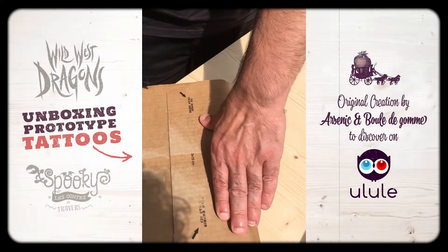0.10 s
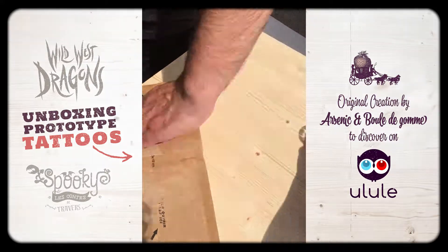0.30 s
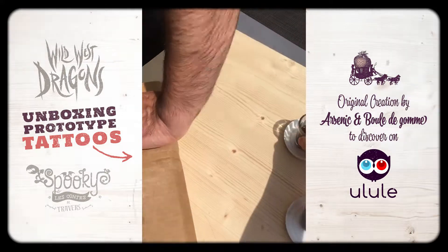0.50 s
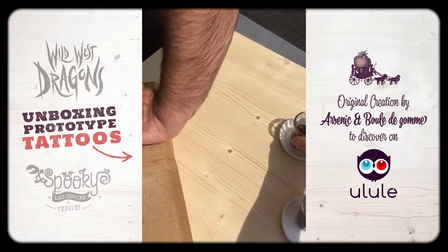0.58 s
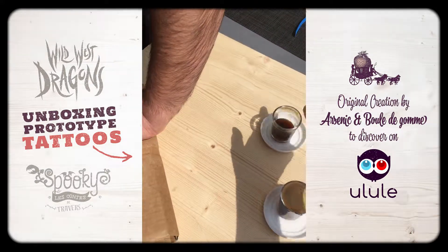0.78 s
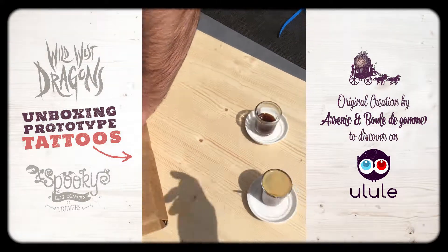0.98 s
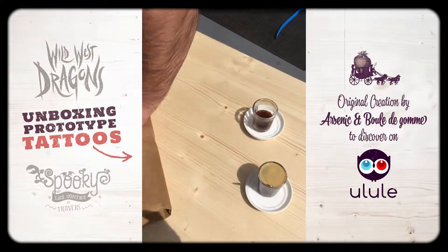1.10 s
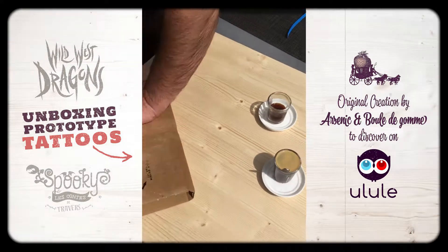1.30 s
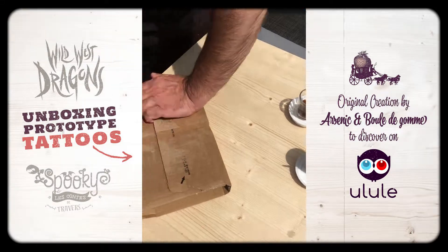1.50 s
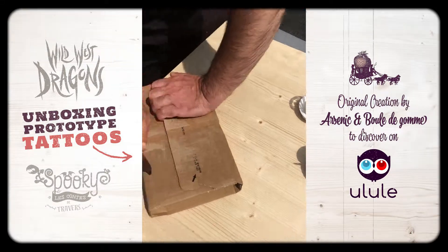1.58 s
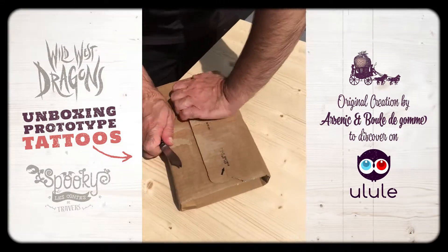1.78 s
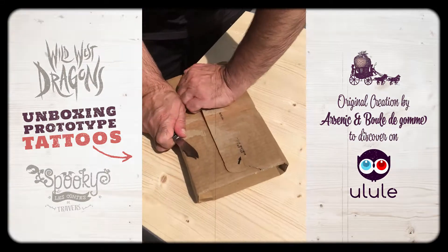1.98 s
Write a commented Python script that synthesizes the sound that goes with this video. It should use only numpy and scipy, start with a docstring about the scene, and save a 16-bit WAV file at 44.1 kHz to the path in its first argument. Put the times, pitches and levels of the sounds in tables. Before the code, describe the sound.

Close mono pickup of a cardboard mailer: hand hiss and a sharp crease snap, a knife knocking on wood, a boxy thump, then sliding, a bright blade tick, gritty rasps and small crackles over quiet rumble.

```python
"""Turning a cardboard mailing envelope

A palm hisses over the card and the parcel scrapes on a wooden table: filtered noise with tiny clicks.
Creases crackle in short bursts of impacts, and the hollow parcel thumps down once as a set of fading tones.
A steel knife clinks against the table, ringing blade and wood, and later gives one sharp, bright tick.
Dull nudges of the hands, gritty rasps and a low background rumble fill in the rest."""
import sys
import numpy as np
from scipy import signal
from scipy.fft import rfft, irfft
from scipy.io import wavfile

SR = 44100
rng = np.random.default_rng(int(sys.argv[2]) if len(sys.argv) > 2 else 0)


def unload_audio(sound):
    """Save the sound as a 16-bit wav file, at the path given as the first command line argument."""
    columns = np.transpose(np.atleast_2d(sound))
    # keep every value between -1 and 1, then stretch to whole-number steps
    steps = np.round(np.clip(columns, -1, 1) * 32767)
    wavfile.write(sys.argv[1], SR, steps.astype(np.int16))


N = 88200  # length of the scene in samples: two seconds
T = np.arange(N) / SR  # time of each sample in seconds

# All colour tables set only the balance of pitches; the filter evens out their overall level.
# Palm rubbing the card, following its pressure: time_s, level_db
PALM_STROKE = [(0, -43.5), (.035, -46.5), (.09, -44.5), (.125, -62.5), (.165, -67), (.205, -37),
               (.235, -69), (.27, -48.5), (.297, -95), (.39, -65.5), (.47, -60), (.53, -54), (.57, -63),
               (.61, -46), (.655, -45), (.71, -41.5), (.745, -63), (.78, -51.5), (.85, -56), (1.0, -46),
               (1.11, -61), (1.25, -53.5), (1.33, -49.5), (1.43, -46.5), (1.48, -55), (1.54, -58),
               (1.62, -45.5), (1.7, -46), (1.77, -47.5), (1.8, -48.5), (1.87, -49.5), (1.96, -43.5),
               (2.0, -44)]
# Tone colour of the palm's hiss: pitch_hz, level_db
PALM_COLOUR = [(60, -8), (300, -6), (520, -6), (900, 0), (1600, 0), (3200, -3), (5000, -10.5), (6300, -1),
               (8000, -3.5), (10500, -0.5), (12500, 2), (15500, 0)]
# Parcel sliding on the table, following its speed: time_s, level_db
SLIDE_STROKE = [(0, -62), (.085, -49.5), (.13, -67), (.15, -53), (.2, -49.5), (.245, -93), (.3, -103),
                (.39, -71), (.46, -60.5), (.57, -71.5), (.75, -57.5), (.81, -51), (.845, -59), (.87, -52.5),
                (.92, -51), (1.01, -43), (1.1, -50.5), (1.14, -49.5), (1.21, -53), (1.27, -48.5),
                (1.34, -60), (1.42, -53.5), (1.49, -63.5), (1.53, -54), (1.58, -47), (1.68, -56.5),
                (1.76, -59), (1.81, -51.5), (2.0, -59.5)]
# Tone colour of the slide: pitch_hz, level_db
SLIDE_COLOUR = [(60, -7), (170, -4), (310, 10.5), (520, -7), (760, -4.5), (1050, 2), (2000, -0.5),
                (3000, -6), (4600, -8), (6000, -7.5), (8000, -11), (15500, -21)]
# Short rasps of the parcel's edge on the wood: start_s, length_s, level_db
RASPS = [(1.109, 0.067, -51), (1.275, 0.16, -45), (1.819, 0.26, -53.5)]
# Tone colour of the rasps: pitch_hz, level_db
RASP_COLOUR = [(300, -22), (900, -7), (2100, 2), (3500, 3), (4500, -0.5), (5600, 1), (7500, -6),
               (15500, -13)]
# Creases giving way: start_s, level_db, length_s, treble_db, push_db (on the parcel, against the crack)
CREASES = [(.029, -42, .004, 6, -25), (.084, -39, .005, -2, -20), (.1418, -38, .0015, 0, -9),
           (.181, -38, .004, -2, -19), (.188, -39, .002, 2, -22), (.2125, -23, .002, 2, -17),
           (.2155, -21, .0017, 2, -14), (.2655, -42, .003, 7, -28), (.2733, -32, .0015, 1, -28),
           (.6795, -32, .009, -18, -20), (.862, -39, .01, -25, -16), (1.242, -39, .004, -4, -20),
           (1.281, -35, .004, -3, -1), (1.304, -38, .004, 0, -24), (1.3205, -38, .003, -2, -24),
           (1.328, -36, .003, -1, -24), (1.3375, -34, .002, -1, -24), (1.3522, -27.5, .002, -4, -24),
           (1.361, -35, .003, 2, -24), (1.386, -39, .001, 0, -22), (1.42, -41, .002, -1, -4),
           (1.513, -44, .001, 0, -20), (1.5325, -39, .002, -3, -12), (1.5635, -29, .0025, -4, -10),
           (1.604, -33, .004, 1, -16)]
# Tone colour of the cracks: pitch_hz, level_db
CREASE_COLOUR = [(100, -23), (350, 5), (520, -51), (660, 9), (850, 11), (1050, 12.5), (1400, 5.5),
                 (1800, 7.5), (2250, 7), (3100, 0.5), (4000, 4), (5200, -1), (6300, 5.5), (10000, 4),
                 (15500, 4)]
# Tones of the hollow parcel on the table top: pitch_hz, level_db, fall_by_60_db_s
PARCEL_MODES = [(160.7, -11.5, 0.16), (211, -4, 0.07), (243, -4, 0.068), (323, -4.5, 0.043),
                (356, -10, 0.039), (643, 0, 0.036), (1100, -35, 0.031)]
# The parcel dropping flat, edge first: start_s, level_db, contact_s
THUMPS = [(0.6807, -26, 0.0019), (0.6839, -22.5, 0.0029)]
# The knife landing and settling: start_s, level_db
KNIFE_HITS = [(.4114, -4), (.4120, 0), (.4172, -11)]
# Tone colour of the knife's knock: pitch_hz, level_db
KNOCK_COLOUR = [(100, -18.5), (350, -9.5), (580, -18.5), (820, -11), (1080, 0.5), (1450, -5), (1850, -6.5),
                (2250, 0), (3000, -14.5), (4200, -15), (6500, -10.5), (8000, -20.5), (10500, -28),
                (15500, -24)]
# Tones of the steel blade: pitch_hz, level_db, fall_by_60_db_s
BLADE_MODES = [(5275, -17, 0.071), (9260, -25, 0.045), (5320, -19.5, 0.052), (9380, -19.5, 0.069),
               (9530, -20, 0.038), (10000, -26.5, 0.035), (10000, -24.5, 0.044), (11820, -43, .14),
               (13420, -36, .035), (15800, -38, 0.091)]
# Tones of the table top under the knife: pitch_hz, level_db, fall_by_60_db_s
TABLE_MODES = [(138, -42, .14), (212, -43, .28), (251, -39, .11), (347, -38, .1), (385, -49, .2),
               (1065, -21, .035), (1295, -21, .025), (1530, -24, .025), (1668, -24, .025),
               (2016, -24, .025), (2233, -24, .028), (3140, -34, .035)]
# Ticks of the blade's tip: start_s, level_db
TICKS = [(1.1550, -28), (1.1563, -15), (1.1655, -37)]
# Tone colour of the ticks: pitch_hz, level_db
TICK_COLOUR = [(200, -16), (1300, -18), (2100, -8), (3000, -10), (4000, -11), (5500, -7), (6600, -5),
               (7600, 3), (9500, -6), (11500, -15), (15500, -14)]
# Dull nudges of the hands against the parcel: start_s, level_db, length_s
NUDGES = [(0.012, -46, 0.033), (0.15, -55, 0.015), (0.411, -39.5, 0.027), (0.793, -52, 0.06),
          (1.23, -49, 0.083), (1.393, -47, .04), (1.549, -41, 0.025), (1.605, -44, 0.024)]
# Tone colour of the nudges: pitch_hz, level_db
NUDGE_COLOUR = [(40, -32), (80, -4), (140, -1), (220, -9.5), (330, -11), (520, -15), (2000, -28)]
# Tone colour of the background rumble: pitch_hz, level_db
BACKGROUND_COLOUR = [(20, -44), (32, -21), (45, 5.5), (75, 3), (110, -6.5), (160, -0.5), (300, -13),
                     (600, -20), (1300, -27), (3900, -26.5), (4900, -24.5), (5600, -22.5), (6500, -20.5),
                     (7800, -26.5), (11000, -34.5), (15500, -32)]

JUDDER_HZ = 43  # how fast rubbing and scraping waver
RASP_EDGE_S = 0.029  # longest swell at the start of a rasp
ECHO_S, ECHO_DB = 0.00244, -17  # a near reflection that gives the card its boxy colour
SNAP_SHARE, CLUSTER_DB = 0.5, -2  # make-up of every burst
TREBLE_HZ, CREASE_TAIL_DB, CREASE_TAIL_S = 3240, -25, 0.018
PUSH_S = 0.0019  # how long a crease pushes on the parcel
PARCEL_LOW_HZ, TABLE_LOW_HZ = 140, 120  # bass below these is weakened
KNOCK_DB, KNOCK_S, KNOCK_TAIL_DB, KNOCK_TAIL_S = -12.5, 0.0018, -21.5, 0.012
BLADE_RISE_S, BLADE_BUZZ_DB, BLADE_BUZZ_HZ = 0.0005, 1.5, 250
TICK_S, TICK_TAIL_DB, TICK_TAIL_S = 0.0008, -29, 0.013
NUDGE_RISE_S = 0.008
BACKGROUND_DB = -57.5
CUTOFF_HZ = 15900


def from_db(db):
    """Turn decibels into a gain."""
    return 10 ** (np.asarray(db) / 20)


def rms_one(x):
    """Scale a signal to unit power."""
    return x / np.sqrt(np.mean(x ** 2) + 1e-20)


def coloured(x, points, size=4096):
    """Filter a sound to a tone colour, with unit power gain and no sound ahead of its cause."""
    hz, db = np.transpose(points)
    grid = np.maximum(np.arange(size // 2 + 1) * SR / size, 1)
    gain = rms_one(from_db(np.interp(np.log(grid), np.log(hz), db)))
    # Folding the cepstrum (spectrum of the log gain) puts the filter's energy as early as possible.
    cepstrum = irfft(np.log(gain))
    cepstrum[1:size // 2] *= 2
    cepstrum[size // 2 + 1:] = 0
    response = irfft(np.exp(rfft(cepstrum)))
    return signal.fftconvolve(x, response)[:N]


def drift(hz):
    """Random wavering, mostly slower than hz, with a spread of one."""
    lowpass = signal.butter(2, hz, fs=SR, output="sos")
    return rms_one(signal.sosfilt(lowpass, rng.standard_normal(N)))


def decay(start, length):
    """A sudden start that dies away exponentially."""
    return (T >= start) * np.exp(-np.maximum(T - start, 0) / max(length, 1 / SR))


def click_at(start):
    """A single-sample click."""
    return 1.0 * (np.arange(N) == int(start * SR))


def burst(start, length, tail_db, tail_s):
    """A clean first snap, a cluster of tiny impacts and a faint scattered tail."""
    snap = SNAP_SHARE * np.sqrt(length * SR / 2) * click_at(start)
    cluster = from_db(CLUSTER_DB) * rng.choice([-1, 1], N) * decay(start, length)
    tail = from_db(tail_db) * rng.standard_normal(N) * decay(start, tail_s)
    return snap + cluster + tail


def push(start, length):
    """A soft contact: a smooth bump of force with a total of one."""
    shape = np.sin(np.pi * np.clip((T - start) / length, 0, 1)) ** 2
    return shape / (shape.sum() + 1e-20)


def ring(force, modes):
    """Fading tones driven by a force; a unit click rings each at its own level."""
    out = np.zeros(N)
    for hz, db, t60 in modes:
        radius = from_db(-60 / (t60 * SR))  # share of the swing kept from sample to sample
        angle = 2 * np.pi * hz / SR
        feedback = [1, -2 * radius * np.cos(angle), radius * radius]
        # The tiny offset avoids very slow arithmetic on near-zero numbers.
        out += from_db(db) * signal.lfilter([0.5, 0, -0.5], feedback, force + 1e-18)
    return out


def ring_alternating(force, modes):
    """Ring a set of tones, every second one upside down."""
    return ring(force, modes[::2]) - ring(force, modes[1::2])


def without_bass(x, hz):
    """Weaken everything below hz."""
    return signal.sosfilt(signal.butter(2, hz, "high", fs=SR, output="sos"), x)


def friction(curve, colour, grains_per_s, size_spread_db, grain_db, judder_db):
    """Smooth hiss plus clicks of catching fibres, juddering under the stroke."""
    size_db = size_spread_db * np.minimum(rng.exponential(1, N), 5)
    sizes = from_db(size_db) * rng.choice([-1, 1], N)
    grains = rms_one(sizes * (rng.random(N) < grains_per_s / SR))
    # grain_db is the level of the clicks against the smooth hiss.
    rub = rms_one(rng.standard_normal(N) + from_db(grain_db) * grains)
    level_db = np.interp(T, *np.transpose(curve)) + judder_db * drift(JUDDER_HZ)
    return coloured(rub * from_db(level_db), colour)


def parcel(force):
    """The hollow parcel rings; it is too small to give off deep bass."""
    return without_bass(ring(force, PARCEL_MODES), PARCEL_LOW_HZ)


def boxy(x):
    """Add one early reflection, turned upside down."""
    return x - from_db(ECHO_DB) * np.interp(T - ECHO_S, T, x, left=0)


def palm():
    """A palm hisses over the card, its noise roughened by catching fibres."""
    return friction(PALM_STROKE, PALM_COLOUR,
                    grains_per_s=2500, size_spread_db=2.5, grain_db=1, judder_db=1.33)


def slide():
    """The parcel scrapes along the wood in a rough, wavering hiss."""
    return friction(SLIDE_STROKE, SLIDE_COLOUR,
                    grains_per_s=1800, size_spread_db=1.6, grain_db=-3.6, judder_db=1.87)


def rasps():
    """The parcel's edge makes short gritty scrapes that swell in, hold and fade."""
    curve = []
    for start, length, db in RASPS:
        swell = min(RASP_EDGE_S, length / 2)
        end = start + length
        curve += [(start - 0.001, -120), (start, db - 15), (start + swell, db)]
        curve += [(start + length * 0.7, db - 2), (end, db - 15), (end + 0.001, -120)]
    return friction(curve, RASP_COLOUR,
                    grains_per_s=1400, size_spread_db=3.2, grain_db=2, judder_db=2.0)


def creases():
    """Each crease cracks briefly and pushes the hollow parcel into ringing."""
    cracks, force = np.zeros(N), np.zeros(N)
    lowpass = signal.butter(1, TREBLE_HZ, fs=SR)
    for start, db, length, treble_db, push_db in CREASES:
        crack = from_db(db) * burst(start, length, CREASE_TAIL_DB, CREASE_TAIL_S)
        low = signal.lfilter(*lowpass, crack)
        treble = crack - low
        cracks += low + from_db(treble_db) * treble
        force += from_db(db + push_db) * push(start, PUSH_S)
    return coloured(cracks, CREASE_COLOUR) + parcel(force)


def thump():
    """The parcel drops flat on the table, and the contacts make it ring."""
    return parcel(sum(from_db(db) * push(start, contact) for start, db, contact in THUMPS))


def knife_clink():
    """The knife knocks on the wood; its hardest touch rings the table and the steel blade."""
    knock = np.zeros(N)
    for start, db in KNIFE_HITS:
        knock += from_db(KNOCK_DB + db) * burst(start, KNOCK_S, KNOCK_TAIL_DB, KNOCK_TAIL_S)
    hardest = max(KNIFE_HITS, key=lambda hit: hit[1])[0]
    click = click_at(hardest)
    # The blade's ring builds up during the touch.
    blade = ring_alternating(click, BLADE_MODES) * (1 - decay(hardest, BLADE_RISE_S))
    buzz = from_db(BLADE_BUZZ_DB * drift(BLADE_BUZZ_HZ))
    table = ring_alternating(click, TABLE_MODES)
    wood = without_bass(coloured(knock, KNOCK_COLOUR) + table, TABLE_LOW_HZ)
    return wood + blade * buzz


def knife_tick():
    """The tip of the held blade catches: tight bursts merge into a dry, bright tick."""
    ticks = sum(from_db(db) * burst(start, TICK_S, TICK_TAIL_DB, TICK_TAIL_S) for start, db in TICKS)
    return coloured(ticks, TICK_COLOUR)


def nudges():
    """Soft pushes of the hands make the parcel rumble briefly, as dull noise."""
    level = np.zeros(N)
    for start, db, length in NUDGES:
        # Taking away a quicker decay gives a soft start.
        level += from_db(db) * (decay(start, length) - decay(start, NUDGE_RISE_S))
    return coloured(level * rng.standard_normal(N), NUDGE_COLOUR)


def background():
    """A steady low rumble made of filtered noise."""
    return from_db(BACKGROUND_DB) * coloured(rng.standard_normal(N), BACKGROUND_COLOUR)


def scene():
    """Hand, parcel and knife over a low background rumble."""
    rubbing = palm() + slide()
    rumble = background()
    card = boxy(rubbing + rasps() + creases())
    mix = card + rumble + nudges() + thump() + knife_clink() + knife_tick()
    return mix[None]  # one channel


def record(dry):
    """Cut the very top of the treble steeply."""
    return signal.sosfilt(signal.ellip(10, 0.2, 70, CUTOFF_HZ, fs=SR, output="sos"), dry)


dry = scene()
out = record(dry)
unload_audio(out)
```